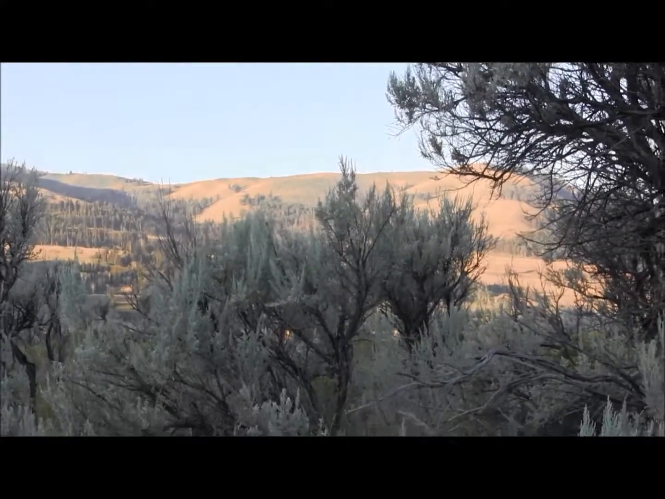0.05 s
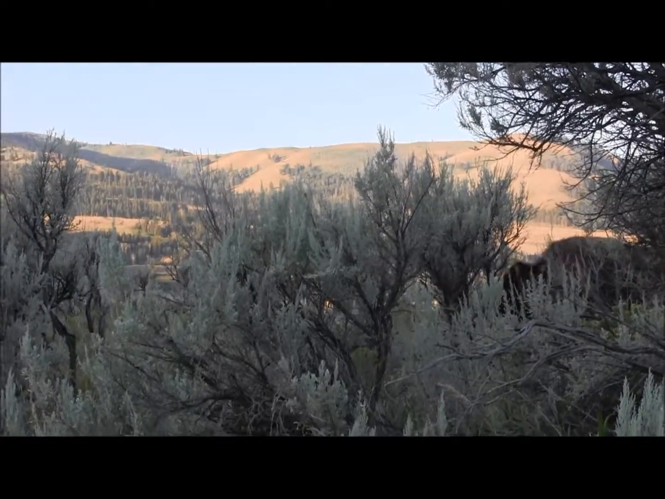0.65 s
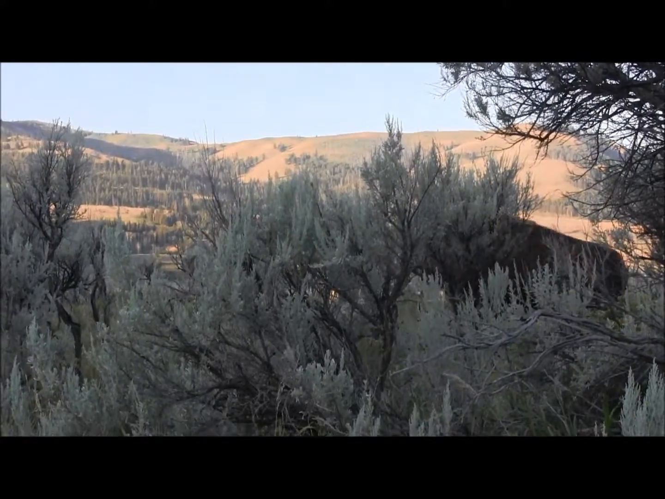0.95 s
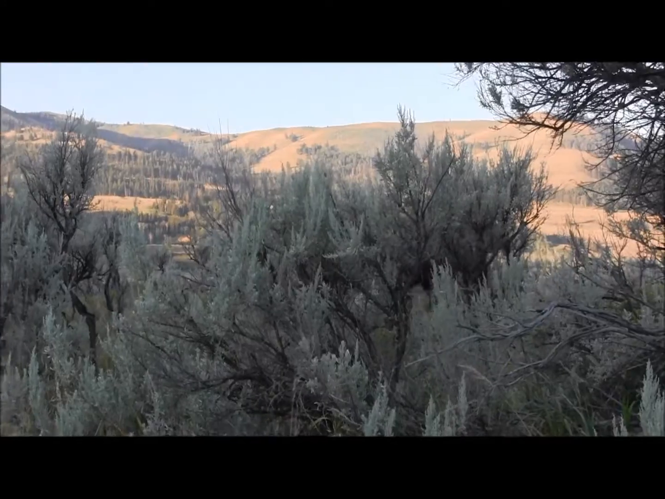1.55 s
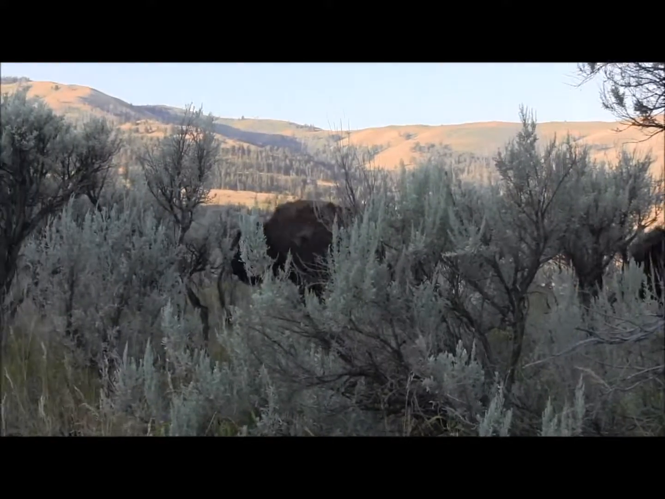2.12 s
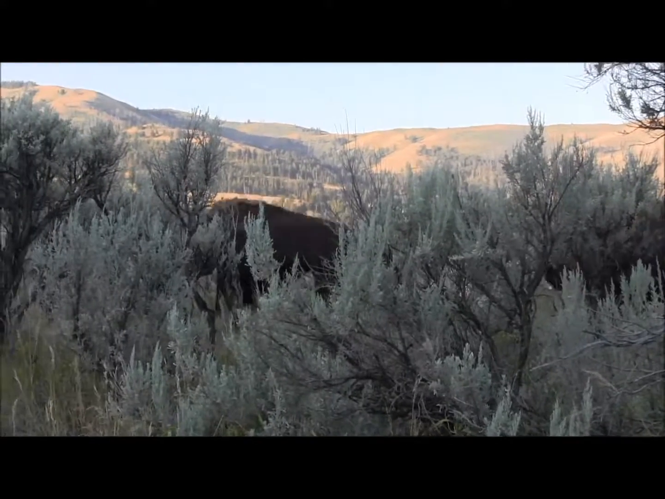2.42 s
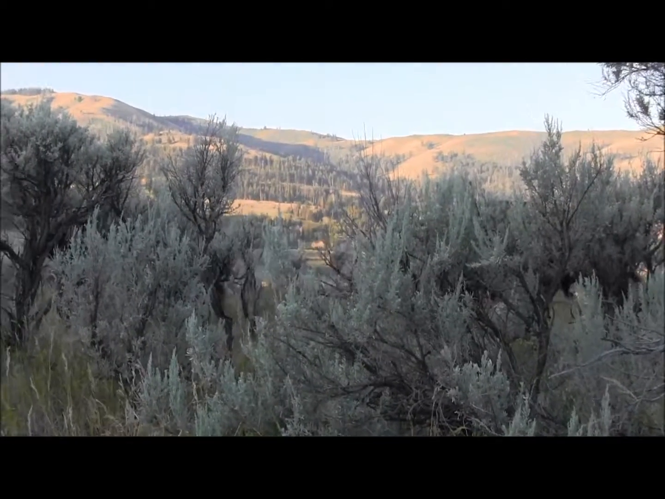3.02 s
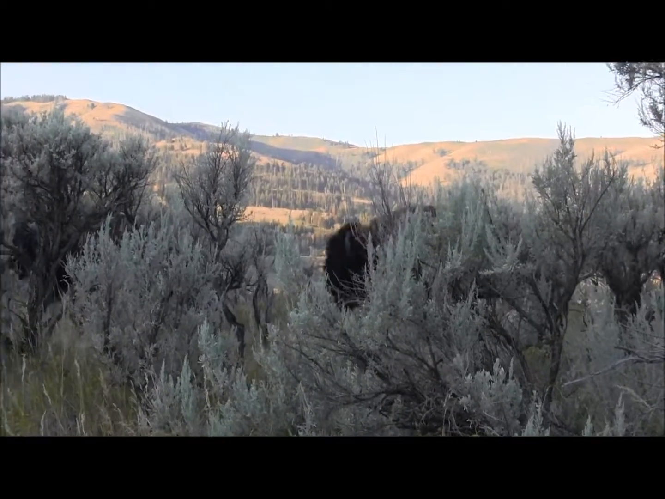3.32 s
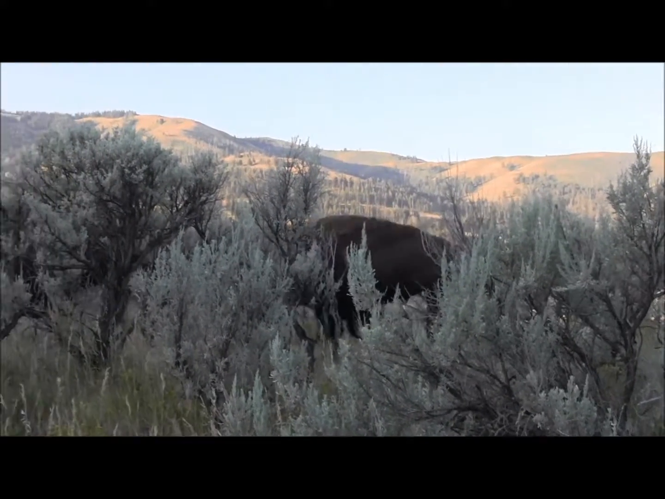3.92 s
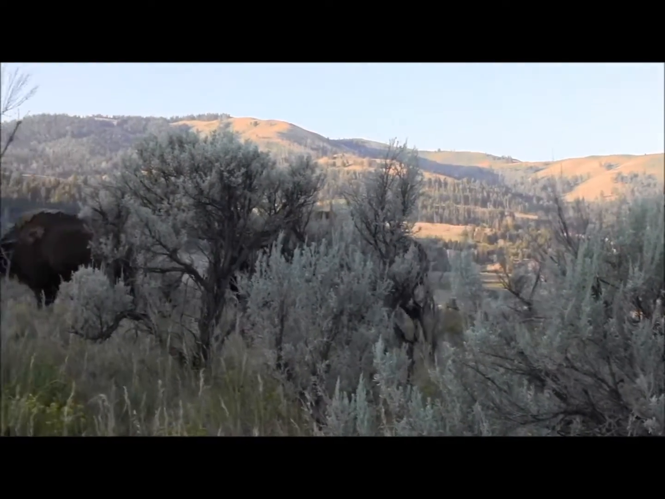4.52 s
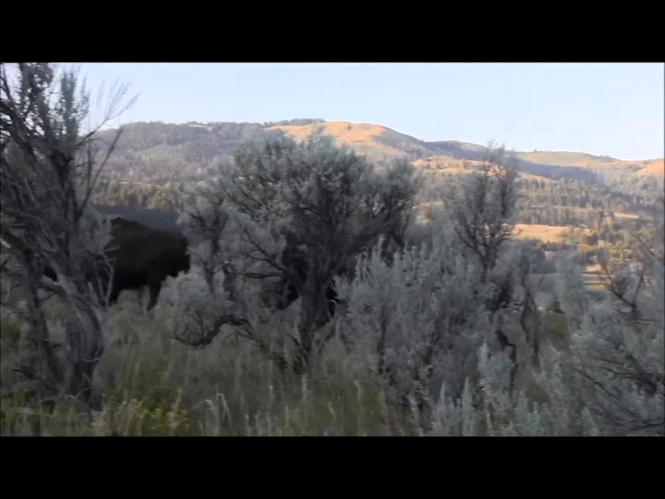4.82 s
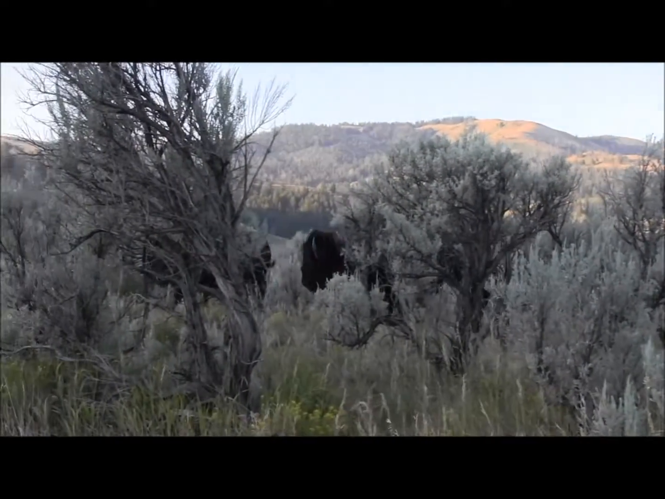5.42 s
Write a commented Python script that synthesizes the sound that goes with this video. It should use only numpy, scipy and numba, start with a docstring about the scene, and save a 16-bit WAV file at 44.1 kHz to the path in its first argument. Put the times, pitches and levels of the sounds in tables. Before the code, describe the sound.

Bison bulls bellow in turn in open brush country, each call a deep, rough roar with a slow, throaty rattle. A long, smooth moan from a farther animal fills the first pause, while twigs snap and leaves swish. Later roars grow sharper and wetter, and the last breaks into single pulses before a soft snort. The herd is straight ahead of the microphone, with gentle wind all around.

```python
"""Bison bulls bellow in turn as they walk through open sagebrush.
From the start, a soft wash of air blows and far animals moan on a smooth low pitch. Almost at once
the roars begin, each a run of slow, separate vocal-fold slaps ringing a long throat. Soon twigs snap
and brush swishes, and a long moan fills the first pause. More roars follow, sharper and wetter.
The last one falls apart into single slaps as the breath runs out, and a snort ends the scene."""
import sys
import numpy as np
from scipy import signal
from scipy.io import wavfile
from numba import njit

SR = 44100
rng = np.random.default_rng(int(sys.argv[2]) if len(sys.argv) > 2 else 0)


def put_to_file(sound):
    """Save the sound as 16-bit audio at rate SR, in the file named by the first command-line argument."""
    columns = np.atleast_2d(sound).T  # one column per channel
    safe = np.clip(columns, -1, 1)
    whole_steps = np.round(safe * 32767)
    wavfile.write(sys.argv[1], SR, whole_steps.astype(np.int16))


N = 249606
TIME = np.arange(N) / SR

# Roars, or fresh surges within one. Each row: first and last steady slap in seconds, number of slaps,
# slowing from 0 to 1, boom in dB, its swell and fade in seconds, rasp in dB, mouth opening in seconds,
# opening speed in dB per second, mouth closing in seconds, breathiness in dB, first resonance and its
# glide in Hz, second resonance and its glide in Hz, hollow ring and sharp bite in dB against the rasp,
# spittle in dB. All levels are relative.
ROARS = [(.010, .376, 15, 0.04, -16.5, 0.014, 0.002, -27.5, 0, 0, 0, -34, 206, -7, 506, 13, -17, -9.5, -72),
         (0.405, .805, 16, 0.04, -4.5, 0.085, 0.078, -18, 0.038, 161, .12, -37.5, 169.6, 28, 537, 118, -3.5, -9.5, -75),
         (1.812, 2.059, 11, 0.07, -5.5, 0.1, 0.008, -19.5, .07, 156, 0, -42.5, 192.4, 13.5, 605, -21, -7, -3.5, -51),
         (3.015, 3.286, 12, .07, -1, 0.24, 0.02, -12, 0.086, 380, 0.055, -48, 226.4, -13.5, 623, -21, -5.5, -7.5, -52),
         (4.404, 4.776, 16, 0.03, -3, 0.19, 0.012, -14, 0.15, 131, .11, -45, 225.3, 0, 648, -115, -3.5, -9, -58.5),
         (4.862, 4.986, 6, 0.02, -4, 0.0096, 0.016, -21, 0.01, -3, 0.017, -33, 206, 8, 570, 5, 2.5, -3, -50),
         (5.012, 5.099, 4, 0.02, -0.5, 0.032, 0.039, -15, 0.014, 101, 0, -33, 238, 6, 553, -100, -0.5, -2, -51),
         (5.127, 5.229, 5, 0.07, -4, 0, 0.014, -14.5, 0.024, 219, 0.084, -35, 215, -2, 561, -140, -2.5, -5.5, -47.5)]
# As the breath runs out, the vocal folds go slack and slap singly.
# Each row: time in seconds, relative boom in dB, relative rasp in dB.
LOOSE_SLAPS = [(2.104, -6, -20), (3.330, -8.5, -23), (3.373, -13.5, -23), (4.83, -7, -17),
               (5.255, 0, -18.5), (5.29, -3.5, -24), (5.328, -3.5, -21.5), (5.365, -5.5, -23.5),
               (5.4, -12, -26), (5.437, -4, -17.5), (5.476, -20, -40)]


def from_db(db):
    """Turn decibels into a number to multiply by."""
    return 10 ** (np.asarray(db) / 20)


def rms_one(x):
    """Scale a sound so that its average power is one."""
    return x / np.sqrt(np.mean(x ** 2) + 1e-20)


def in_time(rows):
    """Join rows that start with a time into smooth curves, one for each other column."""
    s, *columns = np.transpose(rows)
    return [np.interp(TIME, s, c) for c in columns]


def during(rows, fade):
    """One from the first row's time to the last, with soft ends."""
    start, end = rows[0][0], rows[-1][0]
    return np.interp(TIME, [start - fade, start, end, end + fade], [0, 1, 1, 0])


def at_hz(points, hz):
    """Read between the rows of a frequency table, with octaves evenly spaced."""
    points_hz, values = np.transpose(points)
    return np.interp(np.log(hz), np.log(points_hz), values)


def drift(rate):
    """A random wobble of size near one that turns `rate` times a second."""
    knots = rng.standard_normal(4000)
    return np.interp(TIME * rate, np.arange(len(knots)), knots)


def band(x, low_hz, high_hz, order=2):
    """Keep the sound between two frequencies."""
    sos = signal.butter(order, [low_hz, min(high_hz, SR / 2 - 1000)], "band", fs=SR, output="sos")
    return signal.sosfilt(sos, x + 1e-18)


@njit
def resonate(x, hz, width):
    """Make a sound ring at a pitch that may move; more width (in Hz) means a shorter ring."""
    y = np.zeros(len(x))
    for i in range(2, len(x)):
        r = np.exp(-np.pi * width[i] / SR)
        ringing = 2 * r * np.cos(2 * np.pi * hz[i] / SR) * y[i - 1] - r * r * y[i - 2]
        y[i] = (x[i] - x[i - 2]) / 2 + ringing + 1e-18
    return y


def dying(clicks, decay):
    """Give each click a tail that dies away."""
    return signal.lfilter([1], [1, -np.exp(-1 / (decay * SR))], clicks + 1e-18)


def clicks_at(times, spread_db):
    """Clicks of uneven strength, around one."""
    out = np.zeros(N)
    samples = np.clip((times * SR).astype(int), 0, N - 1)
    out[samples] = from_db(spread_db * rng.standard_normal(len(times)))
    return out


def wide(make, side_db):
    """Make a sound twice: once for the centre, once to spread it between the ears."""
    return make() + from_db(side_db) * make() * [[1], [-1]]


def shortfall(elapsed, length, db_per_s):
    """Decibels still missing on a steady rise that takes `length` seconds."""
    return db_per_s * np.maximum(length - np.maximum(elapsed, 0), 0)


def air(patchy_db=2.0, level_db=-5.0):
    """Wind in distant brush: half-octave bands of noise flicker on their own, wider in the treble."""
    # The wind's tone. Each row: frequency in Hz, relative level in dB.
    tone = [(15, -48), (25, -19), (48, -13.5), (71, -6.5), (99, -0.5), (129, -4), (165, 4.5), (216, -1.5),
            (267, -2), (423, -3.5), (633, -12.5), (923, -8.5), (2710, -23), (11000, -41.5), (15600, -42.5)]
    # Its rise and fall. Each row: time in seconds, relative level in dB.
    swells = [(0, -25.5), (1.94, -27), (2.79, -28.5), (3.31, -25), (3.67, -28), (4.43, -27), (5.09, -25),
              (5.66, -27)]
    # Its width. Each row: frequency in Hz, how alike the two ears are from 0 to 1.
    likeness = [(25, .55), (60, .92), (150, .99), (380, .95), (950, .92), (2400, .86), (6000, .62),
                (14000, .3)]
    out, edges = 0, 22 * 2 ** np.arange(0, 10, .5)
    white = rng.standard_normal((2, 2, N))
    for k, (low, high) in enumerate(zip(edges, edges[1:])):
        mid, side = band(white[k % 2], low, high)
        hz = np.sqrt(low * high)
        alike = at_hz(likeness, hz)
        gain = from_db(at_hz(tone, hz) + patchy_db * drift(20))
        out = out + gain * (np.sqrt(1 + alike) * mid + np.sqrt(1 - alike) * side * [[1], [-1]])
    return from_db(in_time(swells)[0] + level_db) * out / np.std(band(out[0], 300, 1000))


def short_moan(start, end, start_hz, end_hz, db, edge_db=-1.5):
    """Three rows of time, pitch and level for a straight glide that is loudest in its middle."""
    middle = ((start + end) / 2, (start_hz + end_hz) / 2, db)
    return [(start, start_hz, db + edge_db), middle, (end, end_hz, db + edge_db)]


def moans(waver=0.0063, shimmer_db=3.0):
    """The vocal folds vibrate fast and evenly; the throat lets mainly the third harmonic through."""
    # The herd's short moans. Each row: start and end in seconds, third harmonic at the start
    # and at the end in Hz, level in dB.
    short_moans = [(0, 0.104, 254, 246.4, -26), (0.152, 0.45, 241.4, 250.6, -26.5),
                   (0.558, 0.956, 250, 236.6, -26), (2.132, 2.285, 254.4, 235.3, -27),
                   (3.484, 3.649, 220.3, 247.5, -30), (3.85, 3.982, 231, 217.3, -29.5),
                   (4.048, 4.206, 235, 206, -27.5), (5.51, 5.545, 190, 167, -17.5)]
    # One long moan. Each row: time in seconds, third harmonic in Hz, level in dB.
    long_moan = [(0.95, 198, -26), (1.004, 233.2, -19), (1.492, 220.9, -14), (1.552, 209, -19),
                 (1.744, 206.6, -18.5), (1.8, 216.2, -25)]
    # The tones in a moan. Each row: multiple of the lowest pitch, relative level in dB.
    harmonics = [(1, -34), (2, -12), (3, 0), (4, -23), (5, -44)]
    out = np.zeros(N)
    for rows in [long_moan, *(short_moan(*row) for row in short_moans)]:
        third_hz, level_db = in_time(rows)
        gain = during(rows, fade=0.02025) * from_db(level_db + shimmer_db * drift(70))
        on = gain > 0
        pitch_hz = third_hz / 3 * (1 + waver * drift(60))
        phase = 2 * np.pi * np.cumsum(pitch_hz[on]) / SR
        for k, db in harmonics:
            out[on] += gain[on] * from_db(db) * np.sqrt(2) * np.sin(k * phase + rng.uniform(0, 2 * np.pi))
    return out


def slap_times(jitter_s=.0004):
    """The folds close at a steady rate that slows late in each roar; loose slaps trail some roars."""
    runs = [[s for s, *_ in LOOSE_SLAPS]]
    for first, last, count, slowing, *_ in ROARS:
        k = np.linspace(0, 1, round(count))
        runs.append(first + (last - first) * ((1 - slowing) * k + slowing * k ** 3))
    times = np.concatenate(runs)
    return times + jitter_s * rng.standard_normal(len(times))


def throat_controls(glide_s=.36, effort_hz_per_db=2.4, wander_hz=13.5):
    """Through each roar, effort swells and fades, the mouth opens and shuts, the jaw shifts the vowel."""
    lead_s, loose_s = .006, .034   # the throat is set just before a slap; a loose slap is brief
    rows = np.array(ROARS)
    current = np.maximum(np.searchsorted(rows[:, 0] - lead_s, TIME) - 1, 0)
    (first, last, _, _, boom, swell, fade, rasp, opening, opening_db_per_s, closing, breathy_db,
     first_hz, first_glide_hz, second_hz, second_glide_hz, hollow, bite, spittle_db) = rows[current].T
    since, left = TIME - first, last - TIME
    effort_db = -shortfall(since, swell, db_per_s=80.5) - shortfall(left, fade, db_per_s=115)
    boom_db = boom + effort_db
    rasp_db = rasp - shortfall(since, opening, opening_db_per_s) - shortfall(left, closing, db_per_s=87)
    for s, loose_boom_db, loose_rasp_db in LOOSE_SLAPS:
        on = (TIME > s - lead_s) & (TIME < s - lead_s + loose_s)
        boom_db[on], rasp_db[on] = loose_boom_db, loose_rasp_db
    progress = np.clip(since / glide_s, 0, 1)
    first_hz = first_hz + first_glide_hz * progress + effort_hz_per_db * effort_db + wander_hz * drift(35)
    second_hz = second_hz + second_glide_hz * progress ** 2
    # a roar turns sharper and wetter as it goes on
    bite_db, spittle_db = bite + 6.5 * progress, spittle_db + 7 * progress
    return boom_db, rasp_db, breathy_db, first_hz, second_hz, rasp_db + hollow, bite_db, spittle_db


def roars(open_damping_hz=320., boom_gain_db=6., rasp_gain_db=4.5, resting_second_hz=596., rough=.042):
    """Slaps of the vocal folds ring the throat: a deep boom, a hollow ring and a rasp."""
    # The throat's upper resonances. Each row: pitch in Hz, width in Hz, relative level in dB.
    throat_rings = [(954, 76, -4), (1268.5, 61.4, -4), (1506, 70, -9), (1770, 370, -6.5)]
    # The highest ones, which give the rasp its bite, with the same columns.
    bite_rings = [(2187, 164, -7.5), (2533, 300, -9), (3240, 430, -14)]
    boom_db, rasp_db, breathy_db, first_hz, second_hz, hollow_db, bite_db, spittle_db = throat_controls()
    times = slap_times()
    slaps = clicks_at(times, spread_db=1.5)
    # the folds open just before each slap, and the open windpipe soaks up the ringing
    openings = times - .002
    opened = dying(clicks_at(openings, spread_db=3), decay=.0016)
    # some closings are crisper than others; with the mouth wide open the folds clap again between slaps
    claps = clicks_at(times, spread_db=2.8)
    gape = np.clip(from_db(rasp_db - boom_db + 5.5), 0, .9)
    claps += gape * clicks_at(times + rng.normal(.0118, .001, len(times)), spread_db=2.5)
    # every slap lets out a burst of rushing air
    burst = rough * dying(claps, decay=0.0042)
    breath = (burst + from_db(breathy_db) * dying(slaps, decay=0.045)) * rng.standard_normal(N)
    chest = resonate(from_db(boom_db + boom_gain_db) * slaps, first_hz, 20.6 + open_damping_hz * opened)
    boom = band(chest, 118.6, 243.4) + from_db(-27.0) * chest
    hollow = resonate(from_db(hollow_db) * (slaps + .5 * breath), second_hz, np.full(N, 30.))
    # the upper resonances move together with the length of the throat
    stretch = (second_hz / resting_second_hz) ** .5
    flow = from_db(rasp_db + rasp_gain_db) * (claps + breath)

    def ring(rows):
        """The airflow rings a set of resonances, every other one upside down."""
        return sum((-1) ** k * from_db(db) * resonate(flow, hz * stretch, np.full(N, width))
                   for k, (hz, width, db) in enumerate(rows))

    rasp = band(ring(throat_rings) + from_db(bite_db) * ring(bite_rings), 1107, 3650)
    return boom + band(hollow, 400, 710) + rasp + from_db(spittle_db) * spittle(openings)


def spittle(times, centre_hz=5175.0, width_hz=160., wander=.16, whistle=0.87):
    """Air spurts through the wet mouth at each opening, with small squeaks whose pitches wander."""
    puffs = dying(clicks_at(times - .003, spread_db=3), decay=.013) * rng.standard_normal(N)
    pitches = [centre_hz * ratio * np.exp(wander * np.clip(drift(30), -2, 2)) for ratio in (.8, 1, 1.2)]
    squeaks = sum(resonate(puffs, hz, np.full(N, width_hz)) for hz in pitches)
    squeaks *= np.sqrt(2 * np.pi * width_hz / SR)
    return band(puffs + whistle * squeaks, 1700, 8800, order=3)


def twigs(decay_s=.0024):
    """Dry twigs break with a short crack; thin ones sound higher."""
    # Each row: start in seconds, level in dB, a frequency near the top of the crack in Hz.
    snaps = [(0.2038, -22, 4370), (0.487, -37, 11000), (.872, -25, 4160), (0.9458, -28, 3700),
             (1.167, -32, 6000), (1.2576, -34, 5000), (1.517, -29.5, 6130), (1.8824, -31, 10000),
             (1.928, -37, 9000), (2.233, -31, 3560), (2.573, -37, 5000), (4.0503, -30, 3980)]
    out, t = np.zeros(N), TIME[:SR // 20]
    for s, db, hz in snaps:
        crack = rms_one(band(rng.standard_normal(len(t)), hz * 0.077, hz * 1.29)) * np.exp(-t / decay_s)
        out[int(s * SR):int(s * SR) + len(t)] += from_db(db) * crack
    return out


def swishes(grain_db=5.5):
    """Stiff leaves scrape in short grainy strokes."""
    # Each row: middle in seconds, half length in seconds, level in dB, rough top of the hiss in Hz.
    strokes = [(0.53, 0.026, -53, 10000), (0.895, 0.022, -42, 4460), (1.146, 0.018, -50, 9000),
               (1.487, 0.032, -46, 8000), (2.645, 0.024, -46.5, 9900), (2.721, 0.0085, -39.5, 2780),
               (2.88, 0.057, -53, 10050), (3.377, 0.0069, -41, 7800), (3.98, 0.014, -40, 10100),
               (4.445, 0.017, -45, 8500)]
    out = np.zeros(N)
    grains = rng.standard_normal(N) * from_db(grain_db * drift(900))
    for s, half_length, db, hz in strokes:
        on = np.abs(TIME - s) < 3 * half_length
        swell = np.exp(-((TIME[on] - s) / half_length) ** 2 / 2)
        out[on] += from_db(db) * swell * rms_one(band(grains[on], hz * .5, hz * 0.99, order=1))
    return out


def snort(width_hz=240.0):
    """The bull blows out through a nostril whose resonance falls."""
    # Each row: time in seconds, the nostril's resonance in Hz, level in dB.
    blow = [(5.52, 3240, -44), (5.56, 2480, -37.5), (5.6, 1960, -36.5), (5.66, 1700, -71)]
    hz, db = in_time(blow)
    nostril = rms_one(resonate(rng.standard_normal(N), hz, np.full(N, width_hz)))
    return during(blow, fade=0.015) * from_db(db) * nostril


def scatter(x, ring_s, wet_db, side_db):
    """Bushes and slopes throw back a faint, blurred echo that falls 60 dB in `ring_s` seconds."""
    t = TIME[:SR]
    tail = wide(lambda: rng.standard_normal(SR), side_db) * from_db(-60 * t / ring_s) * (t > .004)
    tail /= np.sqrt(np.sum(tail[0] ** 2))
    return from_db(wet_db) * signal.fftconvolve(x[None], tail, axes=1)[:, :N]


def scene():
    """The herd straight ahead, brush and air all around."""
    herd = roars() + moans() + snort()
    brush = wide(twigs, side_db=-7) + wide(swishes, side_db=-6)
    echo = scatter(herd, ring_s=0.44, wet_db=-16.5, side_db=-9)
    return herd + echo + brush + band(air(), 3.7, 13300, order=3)


def record(dry):
    """The loudest peaks are rounded and the highest treble is cut."""
    cutoff_hz = 15600
    rounded = dry / (1 + np.abs(dry) ** 6) ** (1 / 6)
    return signal.sosfiltfilt(signal.ellip(10, .1, 80, cutoff_hz, fs=SR, output="sos"), rounded)


dry = scene()
out = record(dry)
put_to_file(out)
```